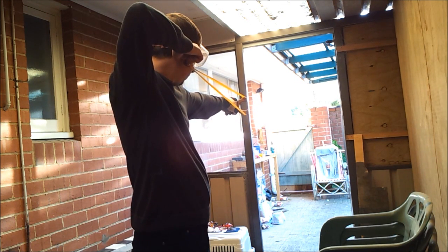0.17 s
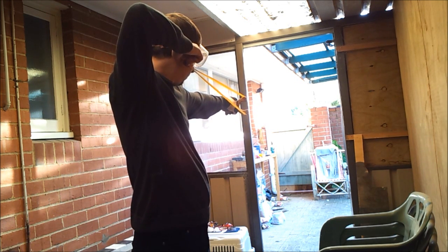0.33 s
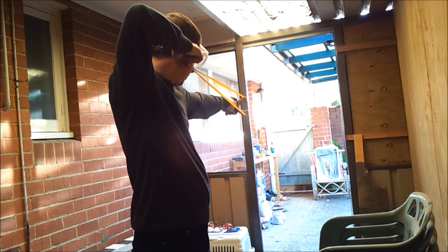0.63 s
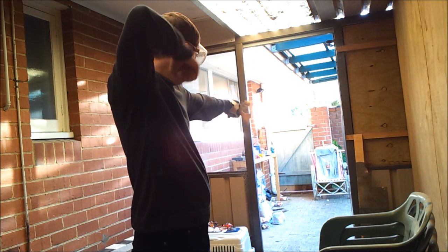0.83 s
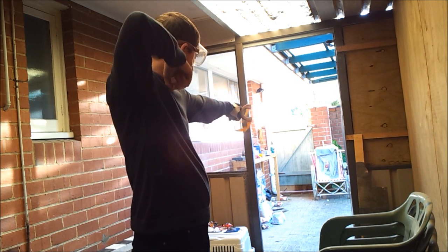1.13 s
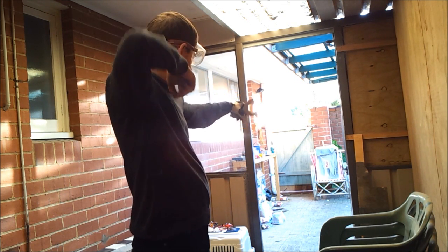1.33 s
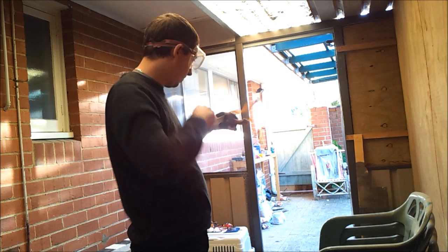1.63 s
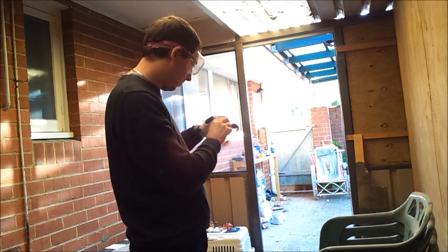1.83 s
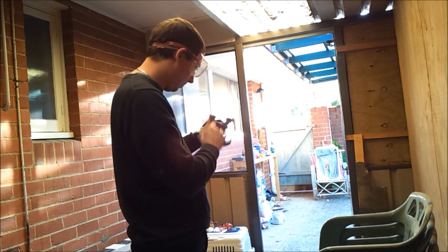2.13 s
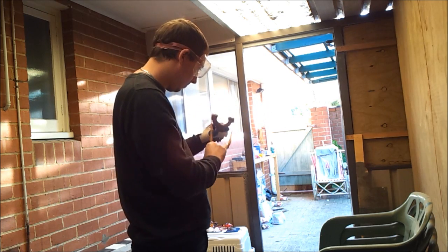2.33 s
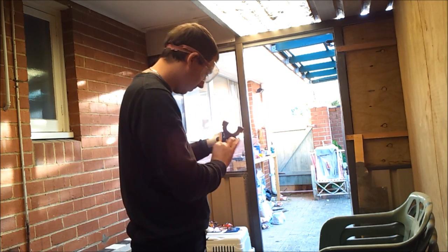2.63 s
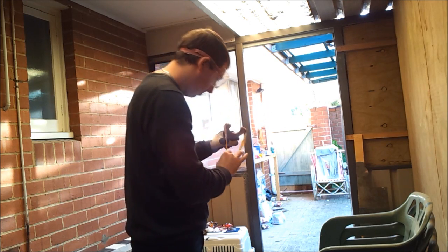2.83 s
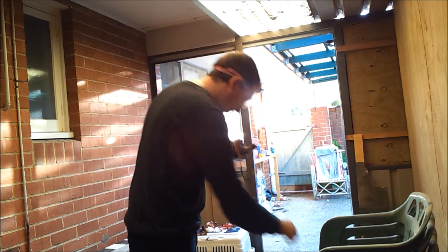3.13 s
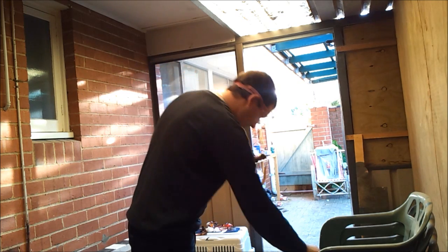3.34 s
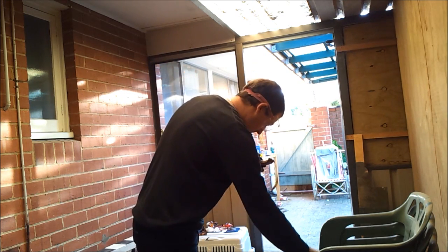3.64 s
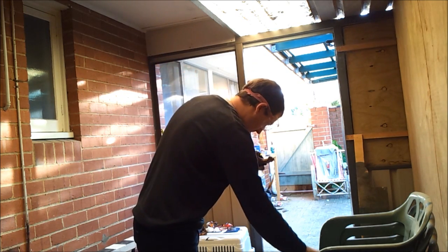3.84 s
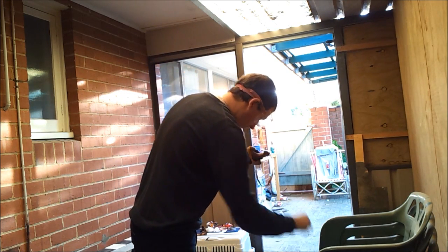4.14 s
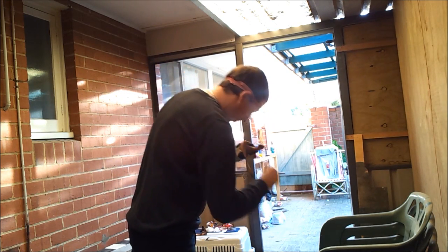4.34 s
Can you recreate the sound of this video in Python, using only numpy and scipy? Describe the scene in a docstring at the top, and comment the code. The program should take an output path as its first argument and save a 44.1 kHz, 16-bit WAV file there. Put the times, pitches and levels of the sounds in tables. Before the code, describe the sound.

Quiet distant traffic rumble and faint handling ticks under a brick porch, then a slingshot's bands snap violently, distorting the microphone. A moment later the steel ball cracks a thin metal can, with a quick weaker return and porch echo. The can drops and hops in its box with shrinking knocks, cloth rustles over a brief low rumble, and fingers rattle through a tray of steel balls.

```python
"""Two unlike microphone ports under a brick porch, ticks in the hands close by and town rumble behind.
The slingshot's pouch ticks free, its bands rush and slap (filtered clicks and noise bursts), overloading
the ports. Down the yard a steel ball cracks a can, which rings (decaying sines); a weaker second swell
comes back from the yard. The can drops, hops and rocks in the catch box (ringing boards). Cloth rustles,
a low rumble swells and fades, then fingers rummage through a tray of steel balls (showers of clicks).
Fading noise gives the echoes of the porch and the yard."""
import sys
import numpy as np
from scipy import signal
from scipy.fft import rfft, irfft, next_fast_len
from scipy.io import wavfile
from scipy.ndimage import uniform_filter1d

SR = 44100
rng = np.random.default_rng(int(sys.argv[2]) if len(sys.argv) > 2 else 0)


def materialize(psi):
    """Save the field psi as 16-bit PCM at rate SR to the path in sys.argv[1].

    A 1-D psi becomes a single channel; in a 2-D psi each row is a channel.
    """
    bounded = np.clip(np.atleast_2d(psi).T, -1, 1)
    quanta = np.round(bounded * 32767).astype(np.int16)
    wavfile.write(sys.argv[1], SR, quanta)


N = 197722

# Levels in the source tables are drives, before the tone filters, echoes and ports.
# pouch and ball slip from the fingers: (time [s], level [dB])
RELEASE_TICKS = [(.7456, -5), (.7464, -10), (.7481, -10)]
# bands rush forward: (start [s], end [s], start level [dB], end level [dB])
BAND_RUSH = (.751, 0.7767, -24, -10)
# bands slap fork and hand: (time [s], level [dB], decay constant [s])
BAND_SLAPS = [(.7627, 11, .006), (.79, 1, .01)]
# colour of ticks, rush and slaps: (frequency [Hz], gain [dB])
SHOT_TONE = [(60, -38), (200, -21), (600, -7), (1500, -5), (2500, -1), (3500, 0), (5000, -3), (7500, 3),
             (10000, 0), (15000, -3.5)]


def shot():
    """Sharp release ticks, a swelling rush of clicks from the bands, then noise bursts as they slap."""
    start, end, start_db, end_db = BAND_RUSH
    ticks = bursts(*np.transpose(RELEASE_TICKS), .00003, 0)
    rush = curve([(start, start_db), (end, end_db)]) * gravel(8000, 2.5)
    slaps = bursts(*np.transpose(BAND_SLAPS), 0) * rng.standard_normal(N)
    return colour(ticks + rush + slaps, SHOT_TONE)


# ball cracks the can, then a weaker, slower second swell comes back from the yard:
# (time [s], crack level [dB], ring level [dB], crack decay constant [s])
CRACK_AND_RETURN = [(.8722, 11, -23, .008), (.92, 5, -27, .015)]
# colour of the crack: (frequency [Hz], gain [dB])
CRACK_TONE = [(60, -38), (200, -19), (350, -4.5), (500, -4), (650, 3), (1000, 2), (1500, 2), (2300, -2.5),
              (3500, -3), (5000, -5), (8000, -6), (15000, -12)]
# ringing of the can wall: (frequency [Hz], level [dB], time to fall 60 dB [s])
CAN_MODES = [(677, -5.5, .1), (706, -5.5, .1), (944, -4.5, .1), (1072, -5, .1), (1209, -6, .1),
             (1340, -6, .1)]


def strike():
    """Steel ball on thin metal: a broad crack of clicks and the can's ringing, then both again, weaker."""
    s, crack_db, ring_db, decay = np.transpose(CRACK_AND_RETURN)
    crack = bursts(s, crack_db, decay, -.6) * gravel(6000, 3)
    push = bursts(s, ring_db, .0005, 0)[0]
    return colour(crack, CRACK_TONE) + ring(push, CAN_MODES)


# the can lands on the box floor; each hop is shorter and weaker
LANDING_S, LANDING_DB, FIRST_HOP_S, HOP_SHRINK, HOP_LOSS_DB = 1.3, -34.5, .178, .65, 9
CONTACT_S, SOFT_CONTACT_SAMPLES, ROCKING_RATE = .0003, 28, 150  # decay constant; smoothing; knocks per s
# one end, the other end, a small rebound: (time after landing [s], added level [dB])
END_CONTACTS = [(0, 0), (.0073, .8), (.027, -5)]
# the can rocks to rest: (time [s], level [dB])
ROCKING_LEVEL = [(1.32, -52), (1.45, -62), (1.85, -62), (2.1, -74)]
# ringing of the boards: (frequency [Hz], level [dB], time to fall 60 dB [s])
BOARD_MODES = [(237, -16, .04), (388, -1.5, .04), (432, -1, .03), (515, -2, .03), (590, -6, .03),
               (673, -10, .035), (824, -12, .035), (1314, -9, .03), (1475, -13, .03)]
# thin boards give off little bass: (frequency [Hz], gain [dB])
BOARD_TONE = [(60, -30), (300, 0), (3000, 0)]


def bounces(count=4):
    """Shrinking hops: the can's ends land in turn and ring the boards; rocking pushes more softly."""
    hop = np.arange(count)
    s = LANDING_S + FIRST_HOP_S * (1 - HOP_SHRINK ** hop) / (1 - HOP_SHRINK)
    db = LANDING_DB - HOP_LOSS_DB * hop
    push = 0
    for late, more_db in END_CONTACTS:
        push = push + bursts(s + late, db + more_db, CONTACT_S, 0)[0]
    rocking = uniform_filter1d(gravel(ROCKING_RATE, 1.2), size=SOFT_CONTACT_SAMPLES)
    push = push + curve(ROCKING_LEVEL) * rocking
    # stronger at the left port
    return colour(ring(push, BOARD_MODES), BOARD_TONE) * undb([[3], [-3]])


# fingers stir the balls: (start [s], hold [s], level [dB], settling [dB/s])
TRAY_STIRS = [(3.395, .165, -31.5, 350), (3.644, .02, -31, 330), (3.78, .05, -51, 60),
              (3.847, .07, -32.5, 300), (3.997, .035, -34, 150), (4.17, .07, -48, 50),
              (4.368, .03, -45, 30)]
STIR_ATTACK_S, STIR_ATTACK_DB = .006, 30


def stirring():
    """Envelope of the moving balls: a quick rise, a hold while the fingers move, then settling."""
    t = np.arange(N) / SR
    s, hold, db, settle = np.transpose(TRAY_STIRS)[:, :, None]
    rise_db = STIR_ATTACK_DB * np.minimum((t - s) / STIR_ATTACK_S - 1, 0)
    settle_db = settle * np.maximum(t - s - hold, 0)
    return (undb(db + rise_db - settle_db) * (t > s)).sum(axis=0)


# bands, pouch and sleeves tick in the hands: (time [s], level [dB], left over right [dB])
CLOSE_TICKS = [(.0448, -52, .5), (.2453, -48, -2), (.5092, -47, 3.5), (1.7389, -42, 3.5), (2.0744, -53, 1),
               (2.1879, -46, 4), (2.4159, -48, -3), (2.4404, -46, -.5), (2.6105, -48, 1), (3.044, -46, -4),
               (3.2445, -50, 0)]
# balls knocked together in the tray: (time [s], level [dB])
TRAY_CLACKS = [(3.42, -24), (3.467, -28), (3.487, -27), (3.507, -27), (3.535, -29), (3.56, -30),
               (3.648, -27), (3.69, -35), (3.782, -37), (3.851, -33), (3.872, -30), (3.911, -31),
               (4.003, -21), (4.045, -26), (4.088, -32), (4.197, -30), (4.299, -38), (4.373, -27),
               (4.421, -24)]
TICK_S, CLACK_S, CLACK_RISE_S = .014, .004, .003  # decay constants and rise
TRAY_PAN_DB = 2.8  # left over right
STIR_RATE, STIR_SCATTER_DB = 3500, 2.5  # clicks per s; unevenness
# sleeve and bands as the arm drops: (time [s], level [dB])
ARM_RUSTLE = [(1.2, -74), (1.4, -60), (1.9, -59), (2.1, -55), (2.3, -63), (2.6, -74)]
# colour of ticks and balls: (frequency [Hz], gain [dB])
STEEL_TONE = [(300, -24), (1000, -2), (1500, -3), (2100, 6.5), (3000, 1), (5000, -3), (7500, 0),
              (10000, -1), (15000, 0)]
# colour of the rustle: (frequency [Hz], gain [dB])
RUSTLE_TONE = [(300, -24), (1500, -3), (3000, 0), (5000, -2), (7500, 4), (11000, -4), (15000, -2)]


def hands():
    """Showers of clicks shaped into small ticks, cloth rustle, and steel balls rattling in the tray."""
    s, db, pan_db = np.transpose(CLOSE_TICKS)
    ticks = bursts(s, db, TICK_S, pan_db)
    clacks = bursts(*np.transpose(TRAY_CLACKS), CLACK_S, TRAY_PAN_DB, rise=CLACK_RISE_S)
    knocks = (ticks + clacks) * gravel(20000, 1.2)
    tray_pan = undb([[TRAY_PAN_DB / 2], [-TRAY_PAN_DB / 2]])
    rattle = stirring() * tray_pan * undb(3 * walk(60)) * gravel(STIR_RATE, STIR_SCATTER_DB)
    rustle = curve(ARM_RUSTLE) * undb(3 * walk(21)) * gravel(5000, 2.5)
    return colour(knocks + rattle, STEEL_TONE) + colour(rustle, RUSTLE_TONE)


# fading of the brick porch: (octave centre [Hz], time to fall 60 dB [s])
PORCH_FADE = [(125, .5), (250, .55), (500, .55), (1000, .55), (2000, .5), (4000, .48), (8000, .45),
              (16000, .36)]
PORCH_ALIKE = .42  # power the two ports share
NEAR_S, NEAR_DB = .003, -8  # chairs, table and floor beside the microphones


def porch(dry, walls_db):
    """Quick scatter from things nearby, then brick walls: octaves of noise, each fading at its own pace."""
    t = np.arange(SR) / SR
    hz = np.maximum(np.fft.rfftfreq(SR, 1 / SR), 1)
    log_centres = np.log(np.array(PORCH_FADE)[:, 0])
    noise, walls = rfft(pair(SR, PORCH_ALIKE)), 0
    for k, (_, t60) in enumerate(PORCH_FADE):
        share = np.interp(np.log(hz), log_centres, np.arange(len(PORCH_FADE)) == k)
        walls = walls + irfft(noise * share) * 1000. ** (-t / t60)
    # the first walls answer after a few milliseconds
    walls = walls * np.clip((t - .002) / .012, 0, 1)
    near = pair(SR, .1) * np.exp(-t / NEAR_S)
    return dry + convolve(dry, strength(walls, walls_db) + strength(near, NEAR_DB))


# dull colour of the far echo: (frequency [Hz], gain [dB])
HOUSES_TONE = [(60, 10), (130, 10), (220, 7), (450, 0), (900, -3), (2000, -12), (6000, -26)]
YARD_T60_S, YARD_DB = 3, -28.5


def yard():
    """Faint, dull, long echo from the houses around: coloured noise that swells in, then fades."""
    t = np.arange(N) / SR
    out = colour(pair(N, .45), HOUSES_TONE)
    fade = 1000. ** (-t / YARD_T60_S)
    return strength(out * fade * np.clip(t / .2, 0, 1), YARD_DB)


# a low rumble swells and fades: (time [s], level [dB])
RUMBLE_LEVEL = [(1.1, -70), (1.45, -52), (1.9, -53), (2.3, -66)]
# colour of the rumble: (frequency [Hz], gain [dB])
BASS_TONE = [(30, -14), (70, 0), (180, 0), (300, -14), (1000, -50)]


def rumble():
    """A brief swell of bass noise, mostly alike at both ports."""
    return curve(RUMBLE_LEVEL) * level(colour(pair(N, .7), BASS_TONE), 0)


# colour of the distant town: (frequency [Hz], gain [dB])
TOWN_TONE = [(25, -1), (60, 4), (120, -1), (200, -5), (300, -9), (450, -4), (800, -6), (1200, -9.5),
             (2000, -14.5), (3000, -22), (5000, -32), (9000, -33), (15000, -37)]
TOWN_DB, TOWN_ALIKE = -45.5, .55  # rms before the ports; shared power


def town():
    """Distant traffic: noise in octave bands that swell together and flicker alone."""
    size = next_fast_len(N)
    hz = np.maximum(np.fft.rfftfreq(size, 1 / SR), 1)
    swell, out = walk(1.5), 0
    noise = rfft(colour(pair(N, TOWN_ALIKE), TOWN_TONE), size)
    for step in range(-6, 5):  # octaves from 1 kHz
        share = np.clip(1 - abs(np.log2(hz / 1000) - step), 0, 1)
        band = irfft(noise * share, size)[:, :N]
        out = out + band * undb(.8 * swell + 1.6 * walk(8))
    return level(out, TOWN_DB)


def undb(db):
    """Decibels to gain."""
    return 10 ** (np.asarray(db, float) / 20)


def level(x, db):
    """Scale to an rms level."""
    return x * undb(db) / np.sqrt(np.mean(x ** 2))


def strength(response, db):
    """Scale an echo response to a total energy, averaged over the ports."""
    return level(response, db) / np.sqrt(response.shape[1])


def curve(rows):
    """Gain over time from (time [s], level [dB]) rows, silent outside."""
    s, db = np.transpose(rows)
    return undb(np.interp(np.arange(N) / SR, s, db, -200, -200))


def convolve(x, response):
    """Pass x through a response, cut to the scene's length."""
    return signal.fftconvolve(x, response, axes=-1)[..., :N]


def colour(x, tone):
    """Causal filter through (frequency [Hz], gain [dB]) points, from the folded cepstrum of the log gain."""
    hz, db = np.transpose(tone)
    grid = np.maximum(np.fft.rfftfreq(4096, 1 / SR), 1)
    gain_db = np.interp(np.log(grid), np.log(hz), db)
    cep = irfft(np.log(undb(gain_db)))
    # fold the backward half onto the forward half
    cep[1:2048] *= 2
    cep[2049:] = 0
    return convolve(np.atleast_2d(x), irfft(np.exp(rfft(cep)))[None])


def ring(x, modes):
    """Sum of decaying modes struck by x; neighbours start in opposite directions."""
    t = np.arange(SR // 2) / SR
    response = 0
    for k, (hz, db, t60) in enumerate(modes):
        swing = np.sin(2 * np.pi * hz * t) * 1000. ** (-t / t60)
        response = response + (-1) ** k * undb(db) * swing
    return convolve(x, response)


def pair(size, alike):
    """Two noises that share part of their power."""
    both, left, right = rng.standard_normal((3, size))
    alike = np.clip(alike, 0, 1)
    return np.sqrt(alike) * both + np.sqrt(1 - alike) * np.array([left, right])


def walk(rate):
    """Random levels held 1 / rate s and slewed twice; spread near 1."""
    k = int(SR / rate)
    held = np.repeat(rng.standard_normal(N // 256), k)[:N]
    return 1.3 * uniform_filter1d(uniform_filter1d(held, k), k)


def gravel(rate, scatter_db):
    """Random clicks of uneven size, rate per second on average, rms 1."""
    size = rng.standard_normal(N) * undb(scatter_db * rng.exponential(size=N))
    return level(size * (rng.random(N) < rate / SR), 0)


def bursts(s, db, decay, pan_db, rise=0):
    """Envelopes that jump (or swell) up and die away, placed between the ports."""
    out, t = np.zeros((2, N + SR)), np.arange(SR // 4) / SR
    for start, gain, tau, pan in np.broadcast(s, undb(db), decay, pan_db):
        shape = np.exp(-t / tau)
        if rise:
            shape = shape * np.clip(t / rise, 0, 1)
        first = int(start * SR)
        ports = undb([[pan / 2], [-pan / 2]])
        out[:, first:first + len(t)] += gain * shape / shape.max() * ports
    return out[:, :N]


def scene():
    """Each place has its own echoes: the shooter's hands, the can, the box, the tray."""
    bands, ball = shot(), strike()
    far = convolve((bands + ball).mean(axis=0)[None], yard())
    shooter = porch(bands, walls_db=2)
    can = porch(ball, walls_db=3.4)
    box = porch(bounces(), walls_db=-7)
    tray = porch(hands(), walls_db=-3)
    return shooter + can + box + tray + far + town() + rumble()


# left port, ringing high: (frequency [Hz], gain [dB])
LEFT_COLOUR = [(30, 5), (150, 3), (500, 1), (1000, -3), (2500, -1), (7000, 1), (9500, 6), (10500, 11),
               (11300, 15), (12200, 10), (13500, 5), (15000, 3)]
# right port, ringing lower: (frequency [Hz], gain [dB])
RIGHT_COLOUR = [(30, -2), (150, 0), (500, 0), (1000, 2), (2300, 0), (3500, 5), (4500, 8), (5300, 10),
                (6200, 5), (7500, 2), (10000, -2), (15000, -5)]
LEFT_LAG_SAMPLES, HISS_DB = 10, -58.5
OVERLOAD, TOP_HZ = .84, 14550  # clipping amplitude; top of the band


def record(dry):
    """Each port has its colour and hiss; the left hears a little later; the input clips; the top is cut."""
    left = colour(np.pad(dry[0], (LEFT_LAG_SAMPLES, 0))[:N], LEFT_COLOUR)
    right = colour(dry[1], RIGHT_COLOUR)
    out = np.vstack([left, right]) + undb(HISS_DB) * rng.standard_normal((2, N))
    out = OVERLOAD * np.clip(out / OVERLOAD, -1, 1)
    top_cut = signal.ellip(12, .2, 80, TOP_HZ, fs=SR, output="sos")
    return signal.sosfilt(top_cut, out)


dry = scene()
out = record(dry)
materialize(out)
```